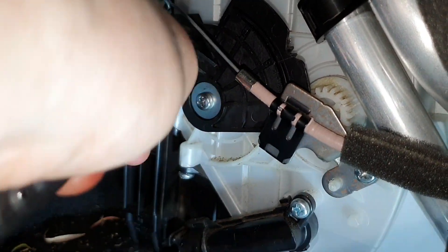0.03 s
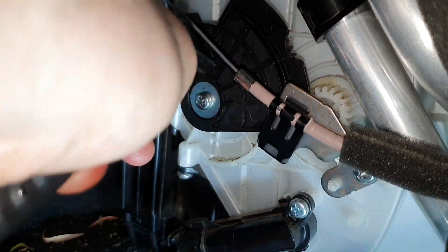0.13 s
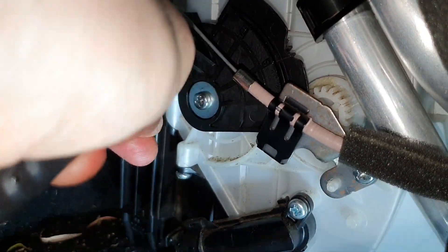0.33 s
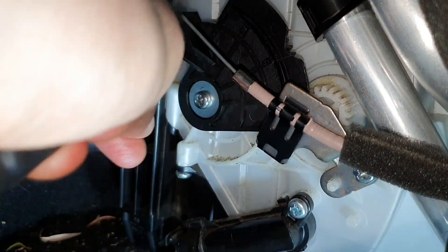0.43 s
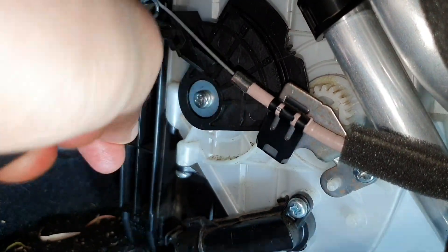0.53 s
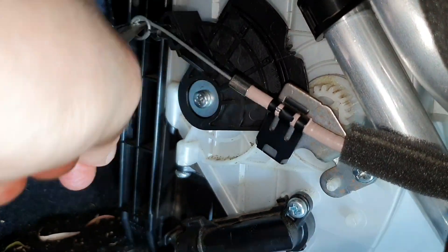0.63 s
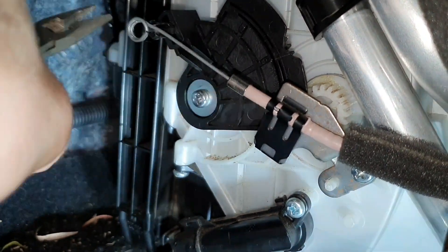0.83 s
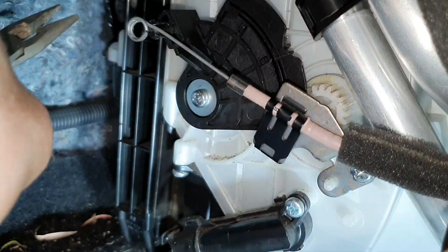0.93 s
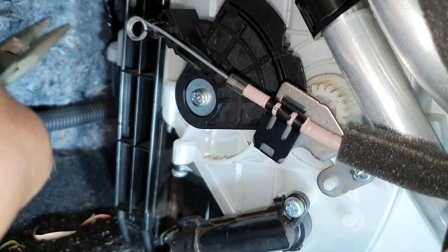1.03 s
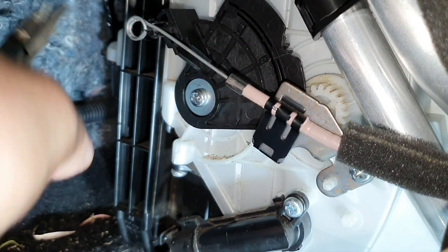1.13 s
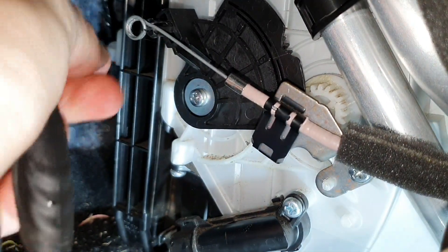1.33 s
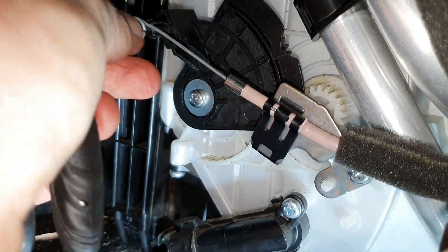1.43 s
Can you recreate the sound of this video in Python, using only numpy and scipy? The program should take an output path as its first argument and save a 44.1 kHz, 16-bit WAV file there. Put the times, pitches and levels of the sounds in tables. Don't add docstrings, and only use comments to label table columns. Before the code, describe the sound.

Pliers snap sharply off a thin wire, then rattle and knock against hard plastic up close

```python
import sys
import numpy as np
from scipy import signal
from scipy.fft import rfft, irfft
from scipy.io import wavfile
from scipy.ndimage import uniform_filter1d

SR = 44100
rng = np.random.default_rng(int(sys.argv[2]) if len(sys.argv) > 2 else 0)


def unload_audio(sound):
    columns = np.transpose(np.atleast_2d(sound))
    steps = np.round(np.clip(columns, -1, 1) * 32767)
    wavfile.write(sys.argv[1], SR, steps.astype(np.int16))


def undo_db(level):
    steps = np.asarray(level, float) / 20
    return 10 ** steps


N = 66150

# (frequency [Hz], level [dB])
CABIN_SPECTRUM = [(15, -28), (35, -10), (70, -0.5), (125, -14), (205, -20), (300, -26.5), (1000, -34),
                  (15000, -46.5)]
# (time [s], level [dB])
HAND_PUSH = [
    (0, 12.5),
    (0.399, 16),
    (0.601, 14.5),
    (0.62, -1.5),
    (.72, 6),
    (0.799, 22.5),
    (.85, 5),
    (.95, 2.5),
]
# (frequency [Hz], left over right [dB])
PORT_BALANCE = [(60, 4), (110, 1.5), (200, 7.5), (380, 1), (700, 0), (1290, 1), (2380, 9), (4400, 14.5),
                (8120, 17), (15000, 11)]
# (time [s], peak [dB], pitch [Hz], T60 [s])
THUMPS = [(0.082, -34, 79.5, 0.03), (.14, -46.5, 73.6, 0.034), (.235, -40.5, 176, 0.1),
          (0.239, -40, 67.3, 0.086), (0.412, -31.5, 121, 0.027), (0.446, -36, 106, 0.093),
          (0.508, -46.5, 102, 0.11), (.53, -53, 202, .12), (0.583, -32.5, 107, 0.02),
          (0.751, -45.5, 165.2, 0.27), (0.773, -34, 91, 0.074), (1.083, -50.5, 56.3, 0.098),
          (1.44, -59.5, 47.4, 0.44)]

# (time [s], level [dB], brightness [dB])
RUBBING = [(.385, -92, -14), (.40, -56, -21), (.45, -55, -12.5), (.49, -54.5, -5), (.53, -57.5, 3.5),
           (.6, -59.5, 2.5), (.65, -65, 5), (.69, -64.5, -1.5), (.72, -66, -3), (.76, -41.5, -3)]
# (time [s], level [dB], brightness [dB])
FUMBLE = [
    (0, -76.5, 0),
    (.04, -81.5, 0),
    (.13, -72.5, 0),
    (.26, -62, 0.0092),
    (.37, -69, 0),
    (.4, -72.5, 0.015),
]
# (time [s], level [dB])
NUDGE = [
    (.06, -93),
    (.074, -59.5),
    (.09, -71),
    (.105, -75),
    (.12, -85),
    (.126, -62.5),
    (.145, -68),
    (.17, -96),
]
# (time [s], level [dB])
SLIDE_OFF = [(.83, -69), (.88, -72), (.94, -69.5), (1.0, -75), (1.07, -88.5), (1.15, -100), (1.38, -100),
             (1.43, -81.5), (1.47, -89), (1.5, -82.5)]
# (time [s], level [dB])
SQUEAK = [
    (.37, -97.5),
    (.385, -72),
    (.41, -67),
    (.44, -80),
    (.48, -96),
]
# (time [s], level [dB])
SKID = [
    (.655, -74.5),
    (.69, -55.5),
    (.715, -49),
    (.8, -58),
    (.84, -104),
]
# (time [s], level [dB])
CRUNCH = [
    (.745, -44),
    (.765, -44.5),
    (.78, -56.5),
    (.797, -44),
    (.81, -51.5),
    (.83, -78),
]
# (frequency [Hz], level [dB])
RUB_SPECTRUM = [(180, -36.5), (300, -11), (647, -11), (1440, -13.5), (2210, -12), (3550, -18.5),
                (12500, -26.5), (15000, -51.5)]
# (frequency [Hz], width [Hz], level [dB])
RUB_PEAKS = [(560, 90, -2.5), (715, 110, -2.5), (1145, 75, 3.5), (1560, 70, -5.5), (2200, 190, -2.5),
             (2350, 70, -4.5), (2976, 150, -0.5), (4112, 470, -6.5), (4736, 100, -6), (5800, 90, -7.5)]
# (frequency [Hz], width [Hz], level [dB])
SLIDE_PEAKS = [(1771, 180, -0.5), (3000, 270, 0.5), (4500, 120, -3), (5336, 270, -2)]
# (frequency [Hz], width [Hz], level [dB])
SQUEAK_PEAKS = [(4800, 200, -2), (6300, 100, 0), (8100, 120, 4.5), (9600, 270, -8), (12300, 300, -12)]

# (time [s], peak [dB], centre [Hz], left over right [dB])
TICKS = [(0.0592, -67, 3660, 18.5), (0.073, -60, 600, 14), (0.081, -64.5, 3000, 14),
         (0.1238, -64.5, 3000, 17), (.124, -52, 600, 2), (.13, -60, 280, -3), (0.146, -68, 3300, 23),
         (.163, -70.5, 3500, 16.5), (.167, -73, 2500, 28), (0.182, -58.5, 3200, 21), (.191, -67, 3300, 5),
         (.250, -46.5, 2710, 14.5), (0.3165, -48.5, 1390, 13), (.317, -74, 3000, 9),
         (0.335, -58.5, 900, 30.5), (0.356, -65, 1440, 25.5), (.397, -59, 3630, 21),
         (0.513, -58.5, 2200, 29), (0.8466, -44.5, 2200, 8.5), (.847, -46, 6940, 13),
         (.8475, -58.5, 4530, 10), (.351, -72, 5000, 12.5), (1.424, -64, 1400, 8.5), (1.497, -63, 600, -7)]
# (time [s], peak [dB], contact [ms])
SNAP = [
    (.2158, -12, 0.011),
    (.2166, -12, 0.04),
    (.2182, -22, 0.15),
    (.2200, -16.5, 0.079),
    (.2217, -11, 0.9),
    (.2252, -15.5, 1),
    (.2315, -27, 1.3),
]
# (time [s], peak [dB], contact [ms])
TAP = [
    (.7183, -21.5, 0.085),
    (.7205, -25.5, 0.23),
    (.7225, -24.5, 0.2),
    (.7255, -33.5, 0.24),
]
# (time [s], peak [dB], contact [ms])
KNOCKS = [(.7458, -22.5, .1), (.7468, -17.5, 0.029), (.748, -18, 0.061), (.7505, -29, 0.08),
          (.7548, -17, 0.1), (.7575, -17.5, 0.039), (.7605, -27, .15), (.765, -28, 0.13),
          (.770, -24.5, 0.1), (.7745, -27.5, 0.18), (.784, -29, 0.11), (.790, -30.5, 0.28),
          (.7972, -33, 0.026), (.8, -35.5, .1), (.805, -42, 0.14)]
# (frequency [Hz], level [dB], T60 [s])
JAW_MODES = [(328.6, -11.5, 0.05), (582, 1, 0.042), (770, -4.5, 0.041), (930, -4, 0.04), (1210, -7, 0.09),
             (1510, -9.5, 0.03), (1900, -4.5, 0.018), (2959, -4, 0.03), (3450, -13, 0.028),
             (5810, -15.5, 0.015), (7560, -20.5, .03), (9180, -11.5, 0.03), (9720, 3, 0.0087),
             (12890, -16, .025)]
# (frequency [Hz], level [dB], T60 [s])
COVER_MODES = [(356, -16, 0.025), (574, -4, 0.031), (810, -0.5, 0.062), (1202, 1, .035), (1915, -4, .03),
               (2323, -6, 0.017), (3200, -7, 0.03), (8700, -18, .01)]
# (frequency [Hz], level [dB], T60 [s])
HOUSING_MODES = [(349.4, -6.5, 0.078), (420, -17, 0.06), (566, -0.5, 0.061), (763, -12.5, .035),
                 (824, -12, 0.028), (1130, -15, .05), (1264, -0.5, 0.045), (2275, -18, 0.03),
                 (2723, -4, 0.03), (2940, -3, .03), (3510, -11, 0.013), (3980, -5.5, 0.016),
                 (4903, -11.5, .02)]
# (frequency [Hz], level [dB])
SNAP_CRACK = [(200, -14.5), (602, -7.5), (1880, -19), (3010, -11), (5450, -25), (8800, -20), (11200, -38),
              (13200, -28)]
# (frequency [Hz], level [dB])
KNOCK_CRACK = [(120, -19), (200, 3), (550, -9.5), (721, -8.5), (1240, -5), (1750, -15.5), (2650, -17.5),
               (8120, -26), (15000, -32.5)]

CABIN_DB = -68.5
ALIKE_HZ = 1015.7
PORT_SHARE = 0.69
PORT_LAG_S, THROUGH_AIR_HZ = 0.000666, 1346
CRACK_T60_S, AIR_T60_S, CRACK_HZ = 0.021, 0.02, 900
TAIL_T60_S, TAIL_HZ = 0.12, 1170
RING_S, RING_CYCLES, SCATTER_DB = 0.022, 14, 2
STREAK_DB = 3


def curve(table, hz):
    p = np.array(table, float)
    return np.interp(np.log(np.maximum(hz, 1)), np.log(p[:, 0]), p[:, 1])


def unit(x):
    return x / np.sqrt(np.mean(x ** 2))


def fall(t, t60):
    return np.exp(-np.log(1000) * t / t60)


def walk(rate):
    hold = int(SR / rate)
    steps = np.repeat(rng.standard_normal(N // hold + 1), hold)
    return 0.93 * uniform_filter1d(steps, hold)[:N]


def add(out, s, x, db, pan_db):
    i = int(s * SR)
    n = min(x.shape[1], N - i)
    out[:, i:i + n] += x[:, :n] * undo_db(db + np.array([[pan_db], [-pan_db]]) / 2)


def port_turn(hz):
    return 2 * np.pi * hz * PORT_LAG_S / (1 + (THROUGH_AIR_HZ / (hz + 1)) ** 2)


def noise(table, size, ports=PORT_SHARE, apart=1.0, bass=0.17):
    hz = np.fft.rfftfreq(size, 1 / SR)
    a, b = rfft(rng.standard_normal((2, size)))
    mix = np.clip(bass + apart / (1 + ALIKE_HZ / (hz + 1)), 0, 1) * np.pi / 4
    common, loose = a * np.cos(mix), b * np.sin(mix)
    port = undo_db(ports * curve(PORT_BALANCE, hz) / 2) * np.exp(.5j * port_turn(hz))
    both = np.array([(common + loose) * port, (common - loose) / port])
    return unit(irfft(both * undo_db(curve(table, hz)), size))


def cabin():
    x = noise(CABIN_SPECTRUM, N, 0.089, 1.0, 0.28)
    low = signal.sosfilt(signal.butter(2, 200, fs=SR, output="sos"), x)
    push_db = np.interp(np.arange(N) / SR, *np.array(HAND_PUSH).T)
    return undo_db(CABIN_DB) * (x + low * (undo_db(4.3 * walk(15) + push_db) - 1))


def thumps():
    out, t = np.zeros((2, N)), np.arange(16384) / SR
    port_phase = np.array([[.2], [-.2]])
    for s, db, hz, t60 in THUMPS:
        swell = np.sin(np.pi / 2 * np.minimum(t * hz / 1.2, 1)) ** 2
        mode = np.sin(2 * np.pi * hz * t + port_phase)
        add(out, s - 0.4 / hz, mode * fall(t, t60) * swell, db + 8.5, 1.5)
    return out


def rubbing(table, colour, peaks, peaks_db, grain_db):
    t, p = np.arange(N) / SR, np.array(table, float).T
    base = noise(colour, N)
    rung = 0
    for hz, width, db in peaks:
        resonance = signal.lfilter(*signal.iirpeak(hz, hz / width, SR), base)
        rung = rung + undo_db(db + STREAK_DB * walk(24)) * resonance
    high = signal.sosfiltfilt(signal.butter(3, 5500, "high", fs=SR, output="sos"), base)
    bright_db = np.interp(t, p[0], p[-1]) * (len(p) > 2)
    x = unit(base + high * (undo_db(bright_db) - 1) + undo_db(peaks_db) * rung)
    pressure_db = np.interp(t, p[0], p[1], left=-120, right=-120)
    return x * undo_db(pressure_db + grain_db * walk(170))


def hands():
    fumble = [(150, -6.5), (330, 2), (3000, -18.0), (15000, -28.5)]
    nudge = [(150, -10), (350, 0.5), (600, 0), (1000, -10.5), (2000, -37)]
    cloth = [(700, -10.0), (1800, -1), (3000, -6.5), (6000, -9.5), (15000, -13)]
    squeak = [(3500, -40), (4600, -1), (12600, 0), (14000, -40)]
    return (rubbing(FUMBLE, fumble, RUB_PEAKS, -12.5, 3.1)
            + rubbing(NUDGE, nudge, RUB_PEAKS, -6, 1.7)
            + rubbing(RUBBING, RUB_SPECTRUM, RUB_PEAKS, 8, 1.1)
            + rubbing(SQUEAK, squeak, SQUEAK_PEAKS, 25, 2.1)
            + rubbing(SLIDE_OFF, cloth, SLIDE_PEAKS, 7.1, 1.02))


def jaws_dragging():
    skid = [(250, -9.5), (700, -6.5), (9000, -45)]
    crunch = [(150, -8), (300, 0), (1200, -7), (5000, -20), (9000, -32), (13500, -36), (14500, -60)]
    return rubbing(SKID, skid, RUB_PEAKS, 0.3, 2.1) + rubbing(CRUNCH, crunch, RUB_PEAKS, -6, 5.5)


def ticks():
    out, t = np.zeros((2, N)), np.arange(4096) / SR
    for s, db, hz, pan_db in TICKS:
        colour = [(hz / 5, -22), (hz, 0), (hz * 2.0, -10), (22000, -10 - 14 * np.log2(9000 / hz + 1))]
        shape = fall(t, 0.0028 + 10 / hz) * np.minimum(t * hz, 1)
        add(out, s, noise(colour, len(t), 0, 0.2) * shape, db, pan_db)
    return out


def blows(table, modes, crack, crack_db, tail_db, air_db, ports):
    out, t = np.zeros((2, N)), np.arange(8192) / SR
    hz, db, t60 = np.array(modes, float).T[:, :, None]
    lean = undo_db(ports * curve(PORT_BALANCE, hz) / 2)
    dull = signal.butter(2, TAIL_HZ, fs=SR)
    thin = signal.butter(1, CRACK_HZ, "high", fs=SR)
    crack_shape = undo_db(crack_db) * (fall(t, CRACK_T60_S) + undo_db(air_db) * fall(t, AIR_T60_S))
    tail_shape = undo_db(tail_db) * fall(t, TAIL_T60_S)
    ring_shape = fall(t, np.minimum(t60, RING_S + RING_CYCLES / hz))
    for s, peak_db, ms in table:
        detune, scatter, loose = rng.standard_normal((3, len(hz), 1))
        turn = port_turn(hz) / 2 + .5 * loose / (1 + (ALIKE_HZ / hz) ** 2)
        phase = 2 * np.pi * hz * (1 + 0.0071 * detune) * t
        g = undo_db(db + SCATTER_DB * scatter) * ring_shape
        left = (g * lean * np.sin(phase + turn)).sum(0)
        right = (g / lean * np.sin(phase - turn)).sum(0)
        hiss = noise(crack, len(t), ports, 0.2)
        x = np.array([left, right]) / 2
        x = x + signal.lfilter(*thin, hiss) * crack_shape + signal.lfilter(*dull, hiss) * tail_shape
        a = np.exp(-1 / (max(ms, .01) * SR / 2000))
        add(out, s, signal.lfilter([1 - a], [1, -a], x), peak_db, 0)
    return signal.sosfilt(signal.butter(4, 230, "high", fs=SR, output="sos"), out)


def pliers():
    return (blows(SNAP, JAW_MODES, SNAP_CRACK, -2, -22.5, -23.5, 0.75)
            + blows(TAP, COVER_MODES, KNOCK_CRACK, -0.68, -18.5, -17.5, 0.33)
            + blows(KNOCKS, HOUSING_MODES, KNOCK_CRACK, 0.14, -23.0, -26.0, 0.32))


def scene():
    return cabin() + thumps() + hands() + jaws_dragging() + ticks() + pliers()


def band_limit(x):
    return signal.sosfilt(signal.butter(12, 15780, fs=SR, output="sos"), x)


def record(dry):
    limit, top_hz = 0.8, 14300
    rounded = limit * np.tanh(dry / limit)
    mix = signal.sosfilt(signal.butter(22, top_hz, fs=SR, output="sos"), rounded)
    return band_limit(mix)


dry = scene()
out = record(dry)
unload_audio(out)
```